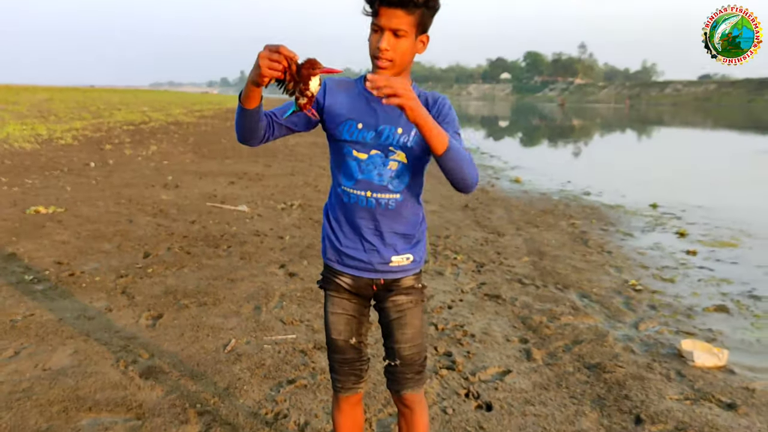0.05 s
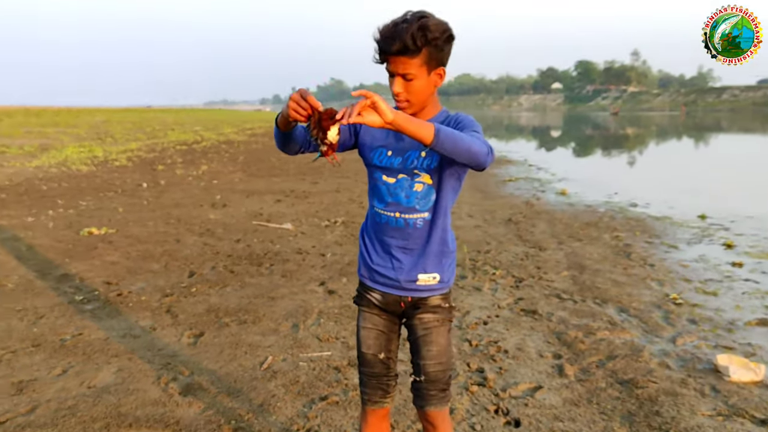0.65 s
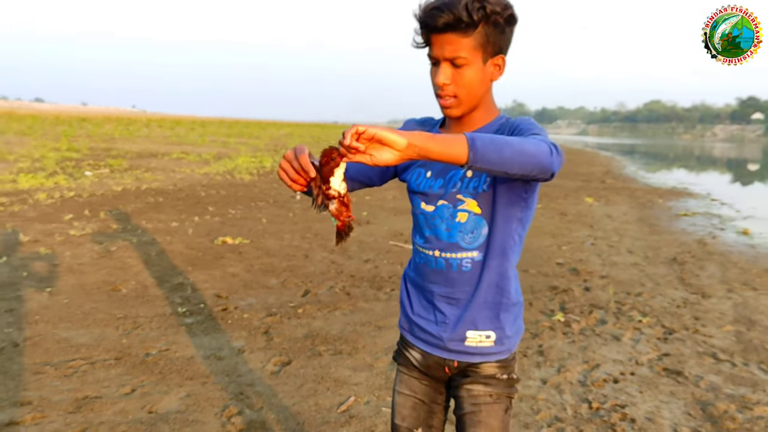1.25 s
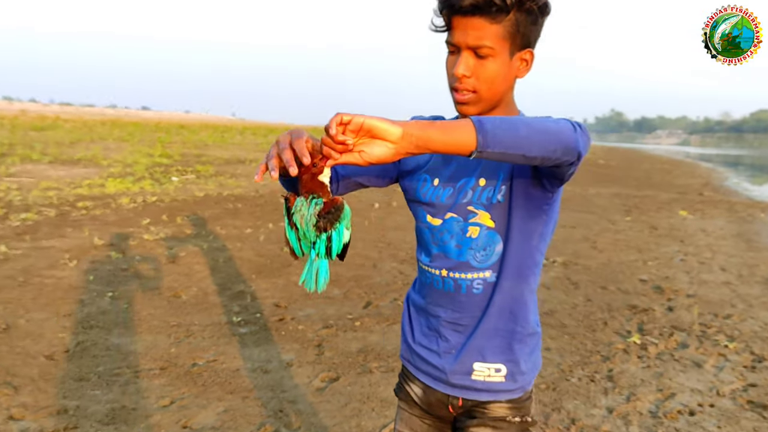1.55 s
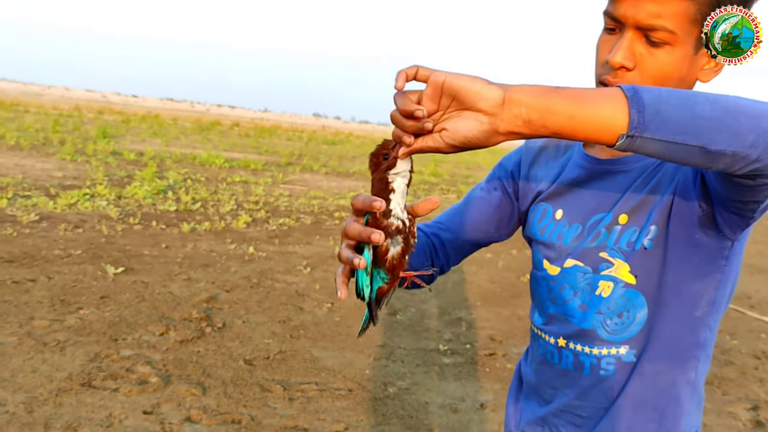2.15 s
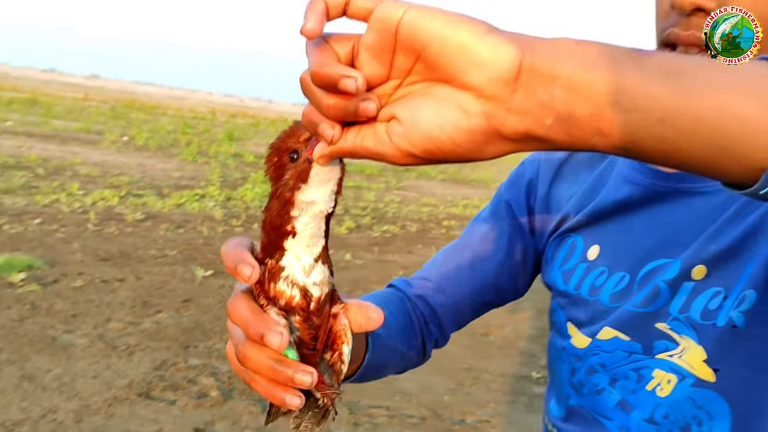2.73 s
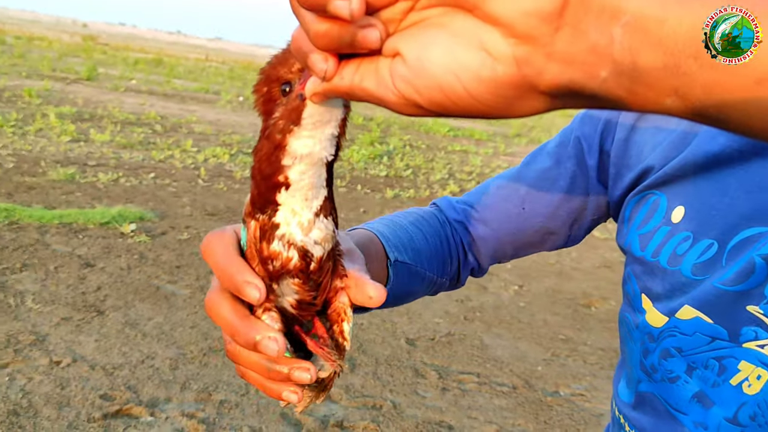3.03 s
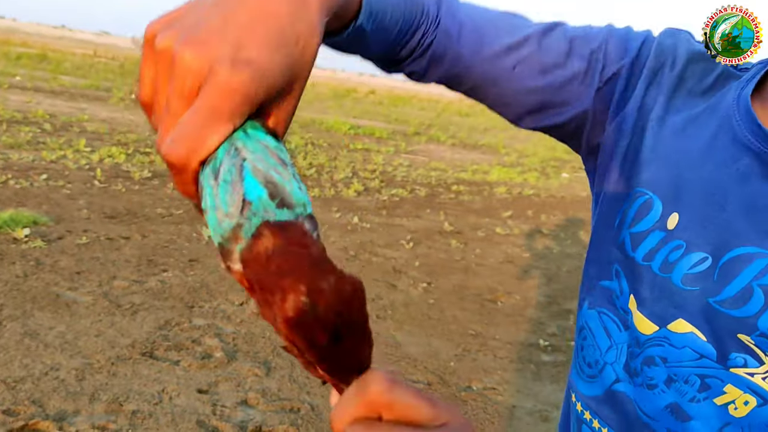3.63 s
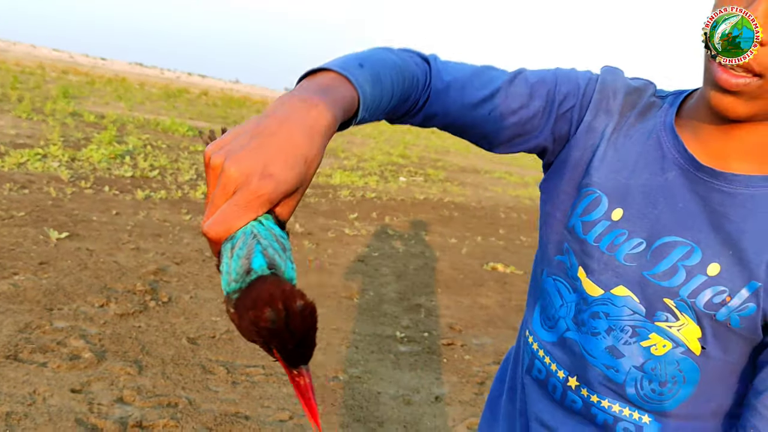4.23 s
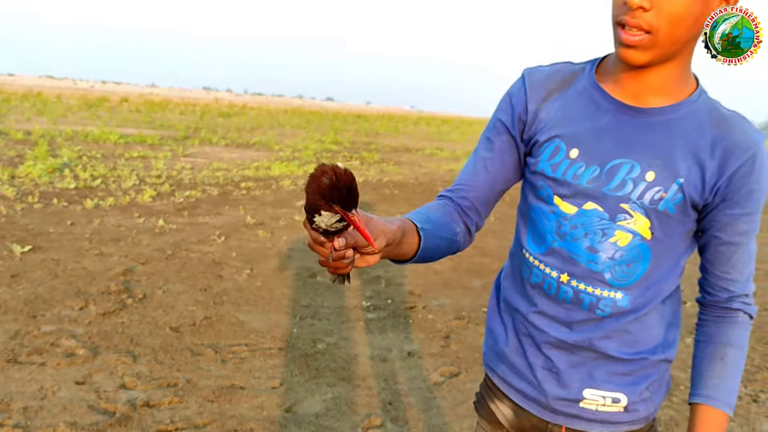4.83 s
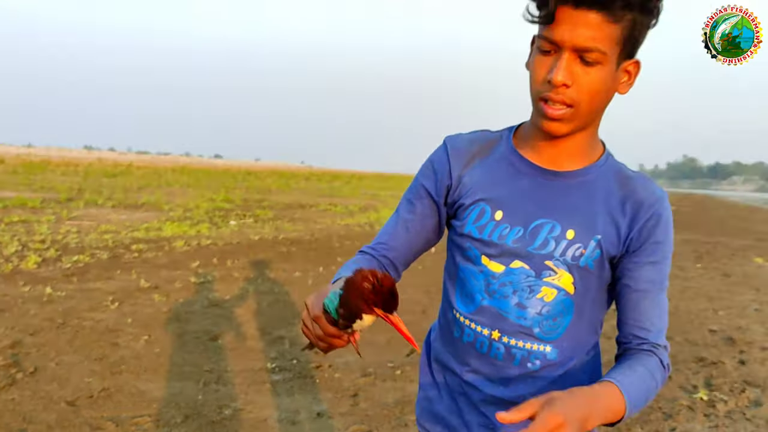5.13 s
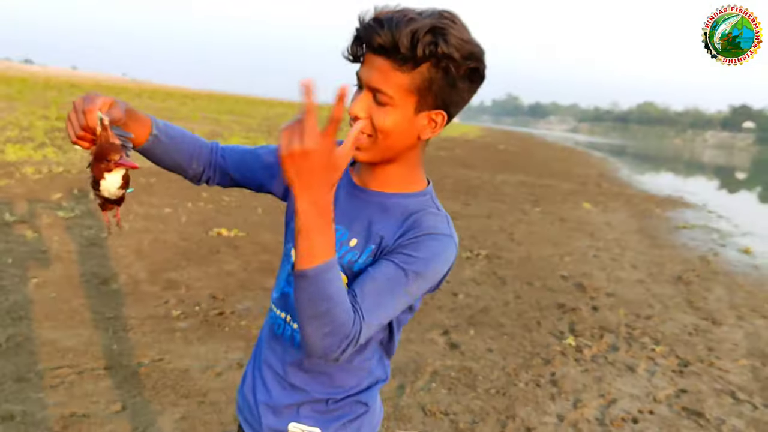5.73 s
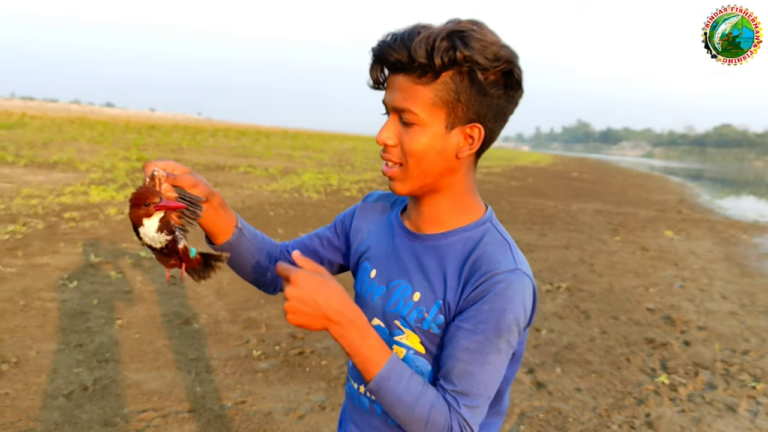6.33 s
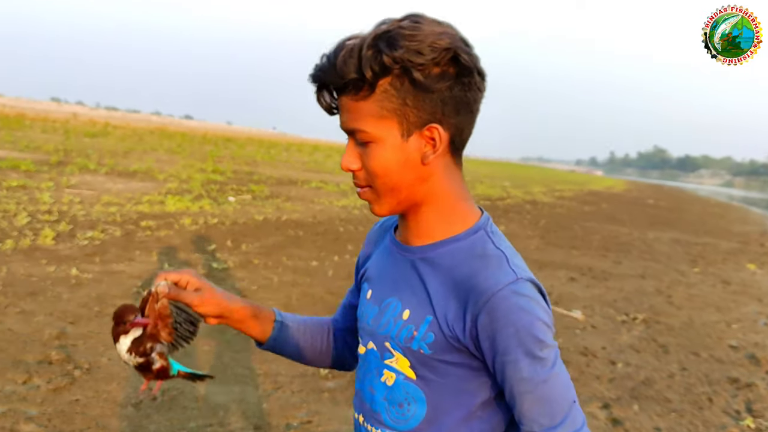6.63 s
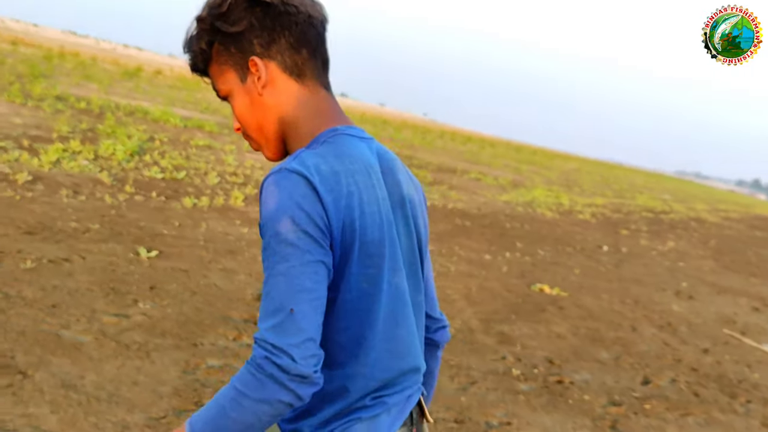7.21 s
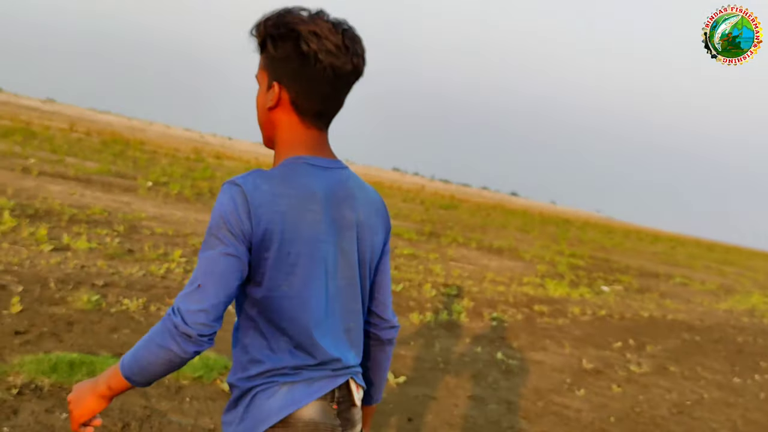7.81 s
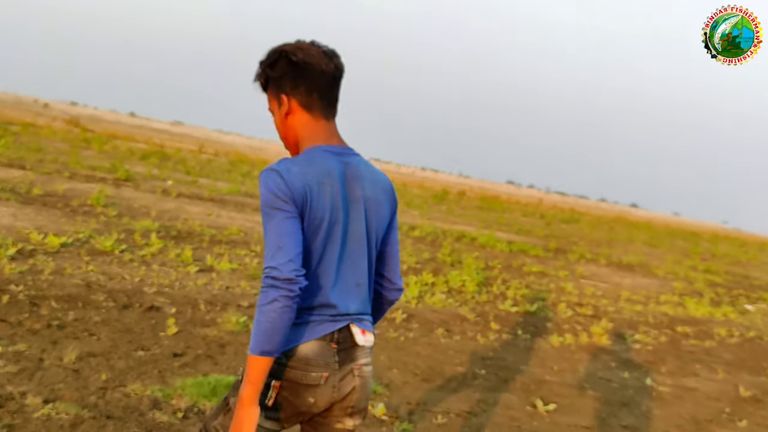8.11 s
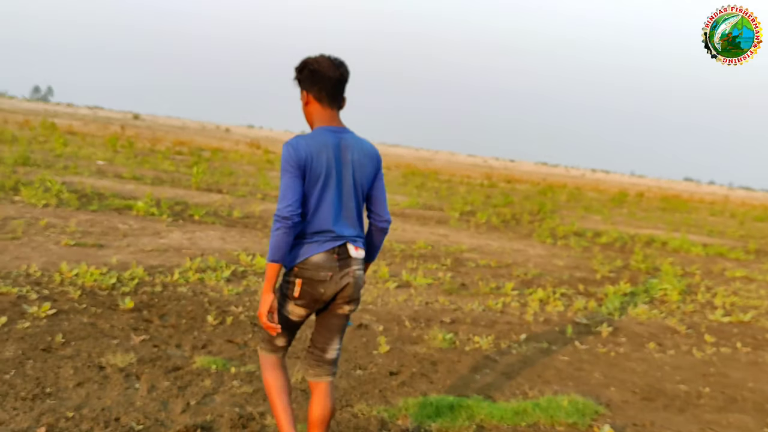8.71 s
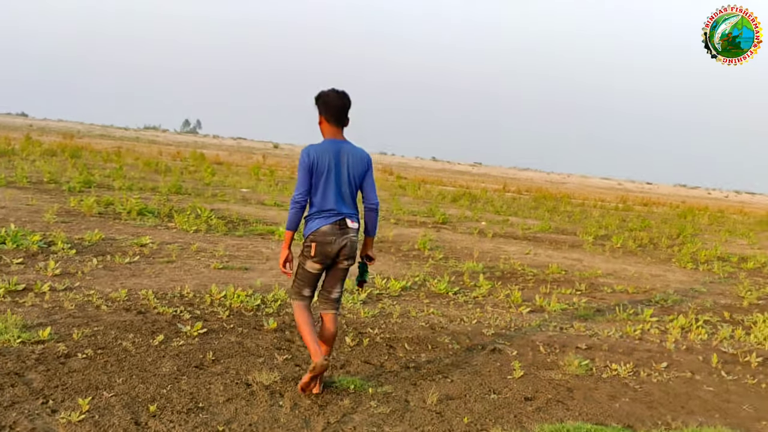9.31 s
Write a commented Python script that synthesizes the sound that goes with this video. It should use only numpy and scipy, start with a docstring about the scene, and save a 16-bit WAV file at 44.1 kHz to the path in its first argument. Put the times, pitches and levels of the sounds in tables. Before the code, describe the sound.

A hand-held kingfisher gives a long run of short, shrill, squeaky calls, over faint distant birds and soft outdoor hiss.

```python
"""An open river bank, with a kingfisher held in the hand giving a long run of short, shrill calls.
Each is a nearly pure, warbling whistle from the syrinx that starts abruptly, sinks, mostly fades,
and comes back faintly off a far obstacle. Farther out, other birds whistle and chirp, their echoes
scattered by ground and plants. There are a few small ticks and two low puffs on the microphone.
A soft outdoor hiss falls away near the end and leaves a duller, distant one."""
import sys
import numpy as np
from scipy import signal
from scipy.fft import rfft, irfft, next_fast_len
from scipy.io import wavfile

SR = 44100
rng = np.random.default_rng(int(sys.argv[2]) if len(sys.argv) > 2 else 0)


def pcm_store(signal):
    """Save signal as 16-bit PCM."""
    levels = np.round(np.clip(np.atleast_2d(signal), -1, 1) * 32767)
    wavfile.write(sys.argv[1], SR, levels.astype(np.int16).T)


N = 417186
TIME = np.arange(N) / SR

# colour of the near and the far hiss: f/Hz, relative level/dB
NEAR_HISS_SPECTRUM = [(15, -36.5), (25, 0.5), (64, -24.5), (170, -15.5), (206, -13.5), (463, -4), (575, -5),
                      (677, 0), (1370, -4), (2910, 1), (5140, -6.5), (6210, -2.5), (9320, -22.5),
                      (14800, -22), (16000, -41)]
FAR_HISS_SPECTRUM = [(25, 1.5), (45, -5), (90, -12.5), (160, -15.5), (250, -11), (500, -15), (900, -13.5),
                     (1800, -11), (3900, -11.5), (4900, -14.5), (8400, -19.5), (12200, -27), (15500, -36)]
# the near hiss falling away: t/s, level/dB
NEAR_HISS_FADE = [(0, -46.5), (4, -46.5), (5.7, -48), (6.9, -52), (7.3, -56), (7.7, -63.5), (9.46, -78.5)]
# hoarse chirps and low notes of the farther birds, single or in runs:
# t/s, notes in the run, spacing/s, length/s, start f/Hz, end f/Hz, level/dB, hoarseness/Hz
CHIRP_RUNS = [(0, 5, .076, 0.034, 5250, 3700, -41.5, 280), (0.918, 1, 0, 0.11, 6840, 6140, -46.5, 294),
              (1.009, 1, 0, 0.11, 5920, 4600, -42.5, 330), (1.13, 1, 0, .3, 7350, 7350, -58, 150),
              (1.185, 5, .06, 0.022, 4690, 5300, -49, 89.8), (1.539, 1, 0, .09, 3430, 3200, -46, 60),
              (1.616, 1, 0, .06, 4830, 4340, -47.5, 100), (1.658, 1, 0, .08, 3050, 2967, -44, 40),
              (1.846, 1, 0, .13, 3554, 3500, -48.5, 30), (2.64, 1, 0, 0.25, 8000, 8050, -59.5, 70),
              (3.698, 2, .142, 0.076, 4750, 4750, -46.5, 150), (3.73, 2, .13, .085, 885, 854, -55, 30),
              (3.914, 1, 0, .17, 7600, 7330, -59, 150), (4.291, 1, 0, .07, 4760, 4430, -48.5, 110),
              (4.39, 1, 0, .1, 817, 815, -55, 30), (4.9, 1, 0, .3, 8410, 7920, -60.5, 193),
              (6.147, 1, 0, 0.26, 7370, 7440, -52.5, 420), (6.421, 1, 0, 0.095, 7600, 7850, -47.5, 330),
              (6.48, 1, 0, .04, 2766, 3200, -46, 300), (6.619, 1, 0, 0.078, 3560, 3650, -45.5, 300),
              (6.71, 1, 0, .1, 3000, 4000, -45, 170)]
# kingfisher calls: t/s, length/s, centre f/Hz, fall/Hz, arch/Hz, level/dB, fade/dB, unsteadiness/dB
CALLS = [(0.2038, 0.071, 6037, 440, -160, -10.5, 4, 2.5), (0.8246, 0.074, 6214, 260, -40.5, -11, 0.0, 1.8),
         (1.2088, 0.075, 6294, 440, -130, -13.4, 7.5, -0.3),
         (1.4859, 0.085, 6240, 300, -30.5, -12, 4.5, 5.7), (1.8547, 0.077, 6233, 460, -59, -13, 7.5, 2.1),
         (2.1655, 0.082, 6110, 480, -120, -8.5, 5.5, 1.3), (2.5531, 0.074, 6202, 250, 9, -13.5, 1, -3),
         (2.8431, 0.074, 6136, 620, 132, -8, 6, 2), (3.1728, 0.076, 6236, 240, -100, -16.5, 10, 3.7),
         (3.4171, 0.086, 6200, 270, -48.5, -9.5, 4.5, 0), (3.8816, 0.076, 6346, 370, -21, -13.5, 1.0, 2.9),
         (4.1112, 0.09, 5966, 390, -130, -10, 5.5, 1), (4.5049, 0.08, 6112, 300, 0.5, -10, -3, 1.0),
         (4.7405, 0.081, 6218, 400, -200, -14.5, 6.5, 3.8), (5.035, 0.091, 6093, 50, -6, -14, 2.5, 6.5),
         (5.4223, 0.076, 6166, 250, -170, -13.5, 4, 1), (5.7126, 0.066, 6498, 800, 461, -9.5, -2, 3.5),
         (5.9712, 0.19, 6205, 180, 56, -11, -2.5, 1.3), (6.306, 0.086, 6300, 680, -280, -16.5, 8.5, 1.5),
         (6.7744, 0.077, 6077, 270, -80, -11, 2, 1.5), (7.053, 0.08, 6177, 640, -140, -18, 3, 1.5),
         (7.396, 0.083, 6227, 440, -100, -21.5, 15.5, 2), (7.737, 0.072, 6264, 420, -160, -30, 12.5, 1.3)]
# faint tones the recorder adds beside each call: harmonic, multiple of the spacing, relative level/dB
RECORDER_SIDE_TONES = [(1, -1, -35.5), (1, 1, -30.5), (1, 2, -45), (2, -2, -47.5), (2, -1, -49.5)]
# colour of the rasp riding on each call, and of its opening snap: f/Hz, relative level/dB
RASP_SPECTRUM = [(30, -6), (150, -1.5), (500, -20.5), (1500, -2), (3200, -20), (4400, 6), (5100, -14),
                 (6800, 3.5), (8200, -1.5), (9000, -12.5), (11000, -4.5), (13000, -12), (15500, -6)]
SNAP_SPECTRUM = [(1000, -25.5), (4000, -15.5), (5800, 1.5), (7500, 1.0), (10000, -36.5)]
# colour of the rumble under loud calls and of the puffs: f/Hz, relative level/dB
RUMBLE_SPECTRUM = [(25, -12), (90, 1), (220, 0.5), (400, -5), (800, -15.5), (1500, -27), (4000, -52)]
# whistles of the farther birds: t/s, length/s, start f/Hz, end f/Hz, level/dB, swell/dB
WHISTLE_NOTES = [(0.522, 0.053, 3540, 4200, -47.5, 3), (0.568, 0.12, 4220, 4250, -44, -3.5),
                 (2.549, .7, 683, 702, -58.5, 5), (7.138, 0.095, 8270, 8100, -46.5, -6),
                 (7.272, 0.12, 7540, 7220, -44, 3), (7.629, 0.041, 6450, 7200, -51, 3),
                 (7.673, 0.11, 7740, 7700, -42.5, -3), (8.039, 0.074, 2250, 3420, -52, 26),
                 (8.176, 0.098, 3200, 3330, -52.5, 8), (8.251, 0.074, 3380, 4540, -42, -2),
                 (8.4, 0.13, 3140, 3280, -61.5, -2), (8.392, 0.095, 3560, 3730, -60, 0),
                 (8.56, .16, 3510, 3950, -65.5, -2), (8.89, 0.098, 8950, 8280, -65, 14),
                 (8.981, .4, 8300, 7660, -65, -10)]
# small ticks: t/s, relative level/dB, f/Hz
DRY_TICKS = [(3.334, -26, 2820), (3.5287, -32, 2850), (4.4141, -34.5, 2800), (5.2689, -30, 2930),
             (5.3061, -35, 2964), (5.46, -29.5, 2864), (6.1826, -34.5, 2958), (6.318, -31.5, 2640)]
# low puffs on the microphone: t/s, length/s, level/dB
MIC_PUFFS = [(4.102, 0.062, -62), (5.709, .08, -45)]


def from_db(db):
    """Decibels to gain."""
    return 10 ** (np.asarray(db) / 20)


def rms_one(x):
    """Scale to rms 1."""
    return x / np.sqrt(np.mean(x ** 2) + 1e-20)


def span(start, end):
    """The samples between two times."""
    return slice(max(0, int(start * SR)), min(N, int(end * SR)))


def ramp(u):
    """A smooth step from 0 to 1."""
    return np.sin(np.pi / 2 * np.clip(u, 0, 1)) ** 2


def swell(at, start, length):
    """Progress through a note, 0 to 1, and its rounded rise and fall."""
    u = np.clip((TIME[at] - start) / length, 0, 1)
    return u, np.sqrt(np.abs(np.sin(np.pi * u)))


def drift(rate_hz):
    """Random wander of rms 1, mostly slower than the given rate."""
    lowpass = signal.butter(2, rate_hz, fs=SR, output="sos")
    return rms_one(signal.sosfilt(lowpass, rng.standard_normal(N + SR))[SR:])


def noise(spectrum):
    """Noise of rms 1 with the given colour."""
    size = next_fast_len(N)
    hz, level_db = np.transpose(spectrum)
    bins = np.maximum(np.fft.rfftfreq(size, 1 / SR), 1)
    colour = from_db(np.interp(np.log(bins), np.log(hz), level_db))
    return rms_one(irfft(rfft(rng.standard_normal(size)) * colour, size)[:N])


def phase_of(hz):
    """Running phase of a gliding pitch."""
    return 2 * np.pi * np.cumsum(hz) / SR


def patter(per_s=70, low_hz=2000, high_hz=4000, ring_cycles=45, spread_db=5.0, pitches=16):
    """Random pips in the hiss, each a click ringing at one pitch; rms 1."""
    sizes = from_db(spread_db * np.minimum(rng.exponential(1, N), 3))
    clicks = (rng.random(N) < per_s / SR) * sizes
    out, pitch_index = np.zeros(N), rng.integers(0, pitches, N)
    for k, hz in enumerate(np.linspace(low_hz, high_hz, pitches)):
        decay, angle = from_db(-60 * hz / (ring_cycles * SR)), 2 * np.pi * hz / SR
        poles = [1, -2 * decay * np.cos(angle), decay ** 2]
        out += signal.lfilter([0, np.sin(angle)], poles, clicks * (pitch_index == k) + 1e-18)
    return rms_one(out)


def air(flicker_db=2.0, ring_hz=935, ring_db=-17, patter_db=-9, far_db=-59.7):
    """The bank's ambience: a fading near hiss with a slight ring and patter, over a steady far hiss."""
    ring = from_db(ring_db) * drift(27) * np.sin(2 * np.pi * ring_hz * TIME)
    near = rms_one(noise(NEAR_HISS_SPECTRUM) + ring + from_db(patter_db) * patter())
    near *= from_db(flicker_db * drift(22))
    near_db = np.interp(TIME, *np.transpose(NEAR_HISS_FADE))
    return from_db(near_db) * near + from_db(far_db) * noise(FAR_HISS_SPECTRUM)


def chirping_birds():
    """Farther birds give short glides, made hoarse by a fast random shake of the pitch."""
    out, shake = np.zeros(N), drift(500)
    for first, count, spacing, length, start_hz, end_hz, level_db, hoarse_hz in CHIRP_RUNS:
        for start in first + spacing * np.arange(round(count)):
            at = span(start, start + length)
            u, shape = swell(at, start, length)
            pitch = start_hz * (end_hz / start_hz) ** u + hoarse_hz * shake[at]
            out[at] += from_db(level_db) * shape * np.sin(phase_of(pitch))
    return np.sqrt(2) * out


def scatter(x, t60_s, delay_s):
    """Diffuse echoes reach the microphone from ground and plants, dying away."""
    t = TIME[:SR]
    tail = rng.standard_normal(SR) * from_db(-60 * t / t60_s) * ramp(t / delay_s - 1)
    return signal.fftconvolve(x, tail / np.sqrt(np.sum(tail ** 2)))[:N]


def call_contours(jitter_hz=14, shimmer_db=0.4252, roughening=4.5, roughen_s=.0053):
    """Pitch and strength of the calls as heard: a scoop up, a warbling descent, a rough flick down."""
    warble_per_s, warble_hz = 40, 105
    scoop_hz, scoop_s, flick_hz, flick_s = 150, .0036, 118.6, .006
    lowest_hz, knee_hz = 5580, 70
    full_attack_s, release_s = .0013, .016
    full_db, bulge_db, utmost_db = -10.5, 1, -5.5
    pitch = np.full(N, np.mean(np.array(CALLS)[:, 2]))
    strength, rough = np.zeros(N), np.ones(N)
    wander_turns = .083 * drift(20)   # the warble hurries and lags
    dips = (np.minimum(drift(55) ** 2, 6) - 1) / np.sqrt(2)   # brief random dips in loudness
    for call, start_turn in zip(CALLS, rng.random(len(CALLS))):
        start, length, centre_hz, fall_hz, arch_hz, level_db, fade_db, unsteady_db = call
        attack = full_attack_s * 2 ** ((full_db - level_db) / 10)   # weak calls start more softly
        at = span(start - attack, start + length + release_s)
        t = TIME[at] - start
        u = np.clip(t / length, 0, 1)
        arch = 1 / 3 - (2 * u - 1) ** 2
        glide = centre_hz + fall_hz * (.5 - u) + arch_hz * arch
        warble = warble_hz * np.cos(2 * np.pi * (warble_per_s * t + start_turn + wander_turns[at]))
        sag = scoop_hz * np.exp(-u * length / scoop_s) + flick_hz * np.exp((u - 1) * length / flick_s)
        # the pitch levels off at the lowest note the bird can hold
        pitch[at] = lowest_hz + knee_hz * np.logaddexp(0, (glide + warble - sag - lowest_hz) / knee_hz)
        loudness_db = level_db + fade_db * (.5 - u) + bulge_db * arch - unsteady_db * dips[at]
        gate = ramp(t / attack + .5) * ramp((length - t) / release_s + .45)
        strength[at] = gate * from_db(np.minimum(loudness_db, utmost_db))
        # the tone flutters and roughens as each call ends
        rough[at] = 1 + roughening * np.exp((u - 1) * length / roughen_s)
    return pitch + jitter_hz * rough * drift(200), strength * from_db(shimmer_db * rough * drift(220))


def kingfisher(octave_db=-40, side_spacing_hz=3900, rasp_db=-38, snap_db=-20, rumble_db=-45):
    """The near whistle with a weak octave, rasp and opening snap; the recorder adds faint side tones."""
    pitch, strength = call_contours()
    phase, side_phase = phase_of(pitch), 2 * np.pi * side_spacing_hz * TIME
    tone = np.sin(phase) + from_db(octave_db) * np.sin(2 * phase)
    for harmonic, multiple, level_db in RECORDER_SIDE_TONES:
        tone += from_db(level_db) * np.sin(harmonic * phase + multiple * side_phase)
    # the snap follows how fast the strength rises
    rise = np.maximum(strength - np.interp(TIME - .0011, TIME, strength), 0)
    snap = from_db(snap_db) * rise * noise(SNAP_SPECTRUM)
    # a soft rumble comes up under the loudest calls
    rumble = from_db(rumble_db) * strength ** 2 * noise(RUMBLE_SPECTRUM)
    rasp = from_db(rasp_db) * noise(RASP_SPECTRUM)
    return strength * (tone + rasp) + snap + rumble


def far_echo(x, delay_s=.205, gain_db=-39.5):
    """A far obstacle sends each call back, faint and slightly smeared."""
    delayed = np.interp(TIME - delay_s, TIME, x, left=0)
    return from_db(gain_db) * scatter(delayed, t60_s=.045, delay_s=.0017)


def whistling_birds(waver_share=.0095, flutter_db=3.5, edge_s=.007):
    """Farther birds draw out thin gliding whistles; the higher the whistle, the more it quivers."""
    out, waver, flutter = np.zeros(N), waver_share * drift(220), flutter_db * drift(60)
    for start, length, start_hz, end_hz, level_db, swell_db in WHISTLE_NOTES:
        at = span(start, start + length)
        u = np.clip((TIME[at] - start) / length, 0, 1)
        gate = ramp(u * length / edge_s) * ramp((1 - u) * length / edge_s)
        glide = start_hz + (end_hz - start_hz) * u
        pitch = glide * (1 + waver[at] * glide / 6000)
        strength = gate * from_db(level_db + swell_db * (u - .5) + flutter[at])
        out[at] += strength * np.sin(phase_of(pitch))
    return np.sqrt(2) * out


def ticks(band_ratio=1.052, gain_db=-4, attack_s=.0015, t60_s=.05):
    """Small dry ticks, each a quickly dying burst of noise around one pitch."""
    out, white = np.zeros(N), rng.standard_normal(N)
    for start, level_db, hz in DRY_TICKS:
        at = span(start - .002, start + .1)
        t = TIME[at] - TIME[at][0]
        band = signal.butter(2, [hz / band_ratio, hz * band_ratio], "band", fs=SR, output="sos")
        envelope = ramp(t / attack_s) * from_db(level_db + gain_db - 60 * t / t60_s)
        out[at] += envelope * rms_one(signal.sosfilt(band, white[at]))
    return out


def puffs():
    """Brief swells of low rumble, right on the microphone."""
    out, rumble = np.zeros(N), noise(RUMBLE_SPECTRUM)
    for start, length, level_db in MIC_PUFFS:
        at = span(start, start + length)
        _, shape = swell(at, start, length)
        out[at] += from_db(level_db) * shape * rumble[at]
    return out


def scene(near_scatter_db=-21, far_scatter_db=-8):
    """At one microphone: the near bird rings briefly off the ground; farther ones trail longer echoes."""
    near, far = kingfisher(), whistling_birds() + chirping_birds()
    near = near + far_echo(near) + from_db(near_scatter_db) * scatter(near, t60_s=.11, delay_s=.004)
    far = far + from_db(far_scatter_db) * scatter(far, t60_s=.49, delay_s=.008)
    return (near + far + ticks() + air() + puffs())[None]


def record(dry, cutoff_hz=15500):
    """A steep low-pass cuts the top of the microphone's signal."""
    return signal.sosfilt(signal.ellip(10, .1, 80, cutoff_hz, fs=SR, output="sos"), dry)


dry = scene()
out = record(dry)
pcm_store(out)
```